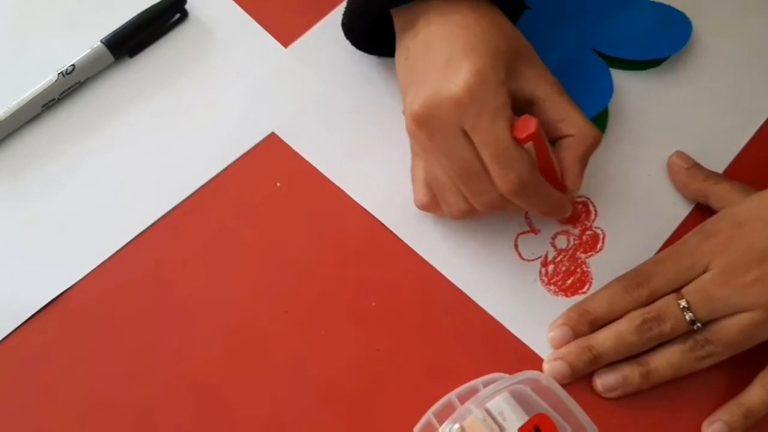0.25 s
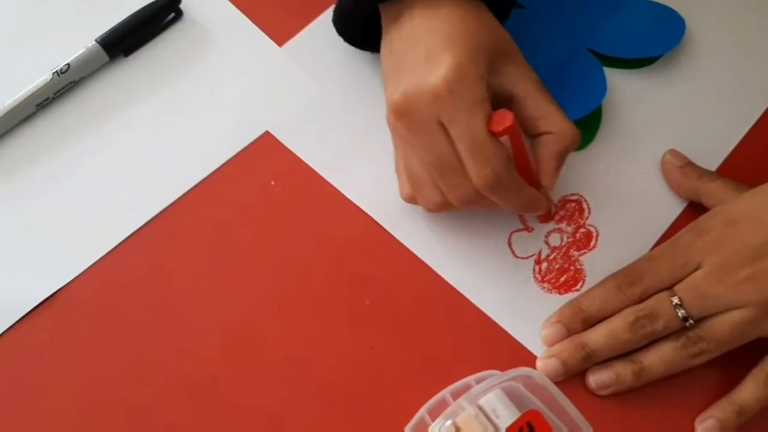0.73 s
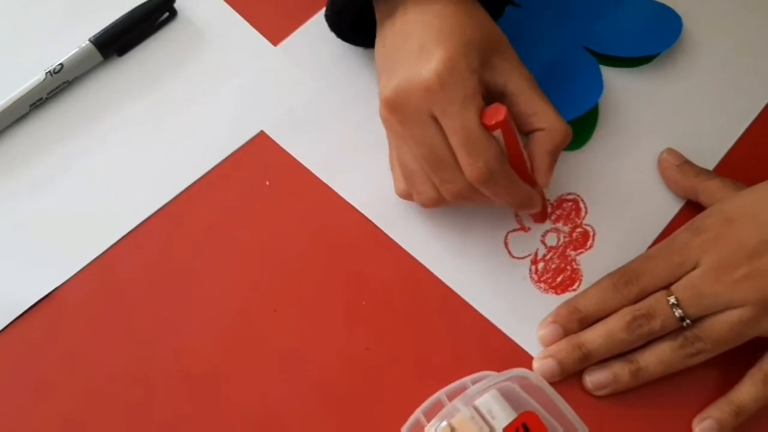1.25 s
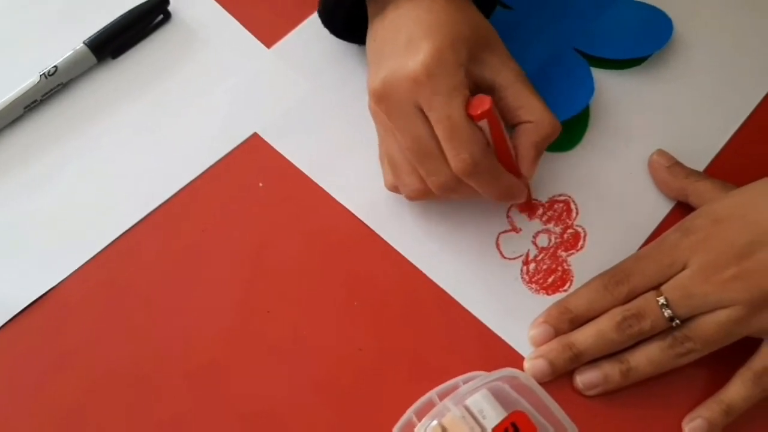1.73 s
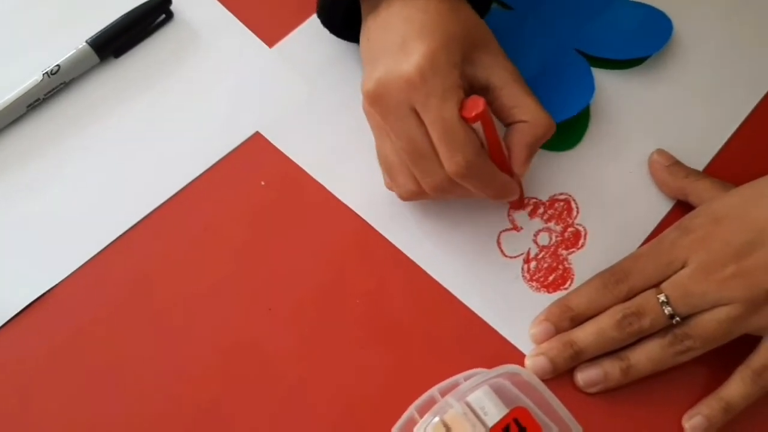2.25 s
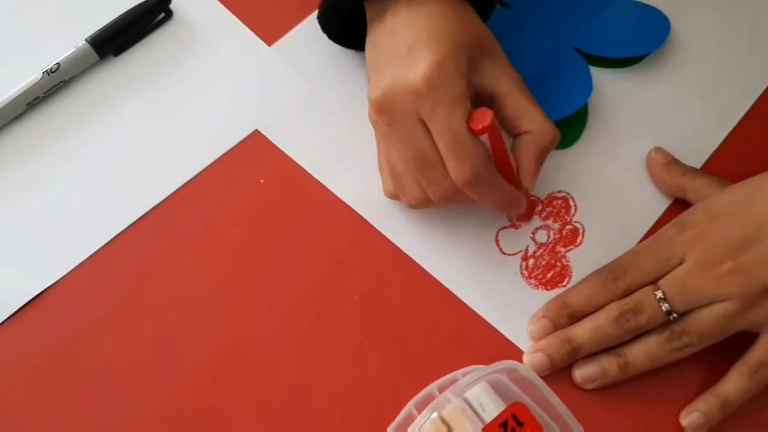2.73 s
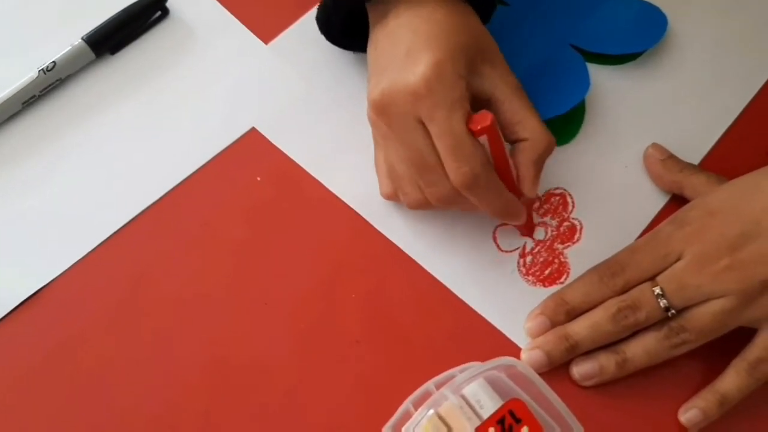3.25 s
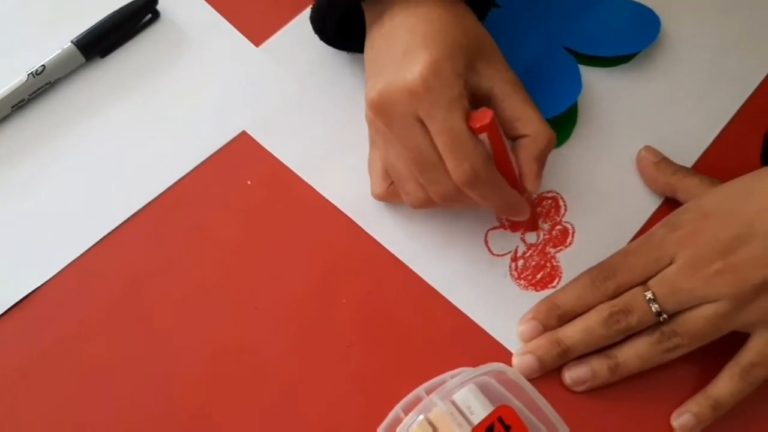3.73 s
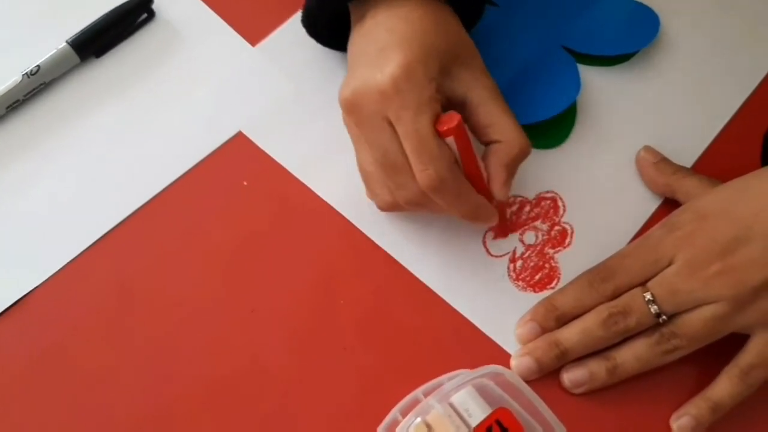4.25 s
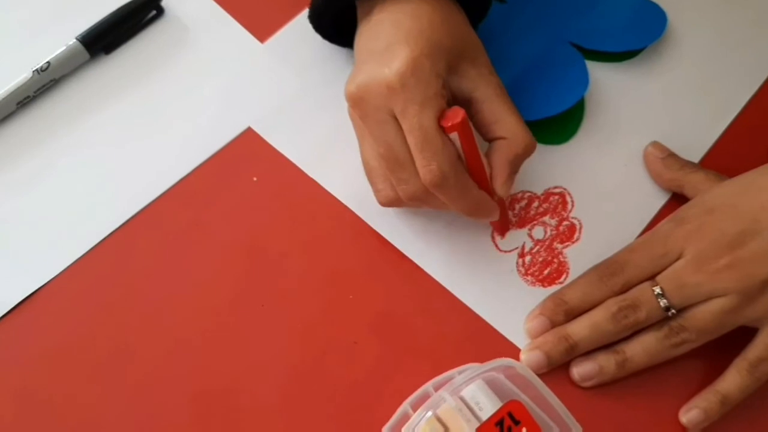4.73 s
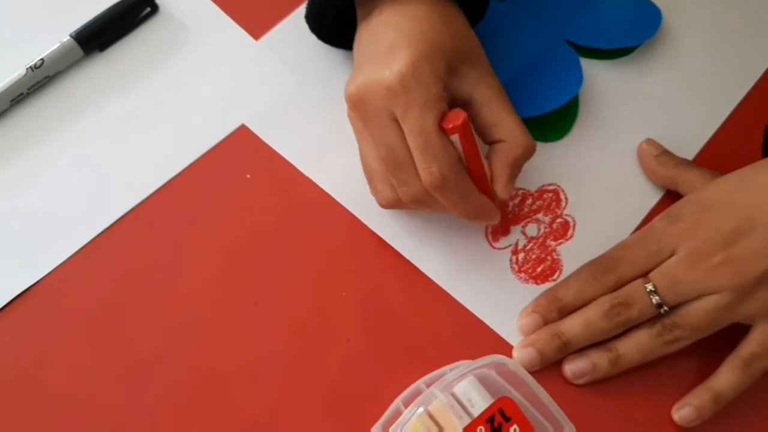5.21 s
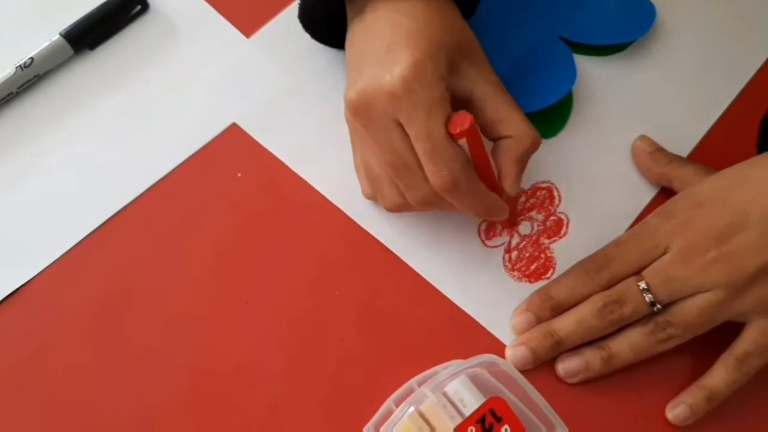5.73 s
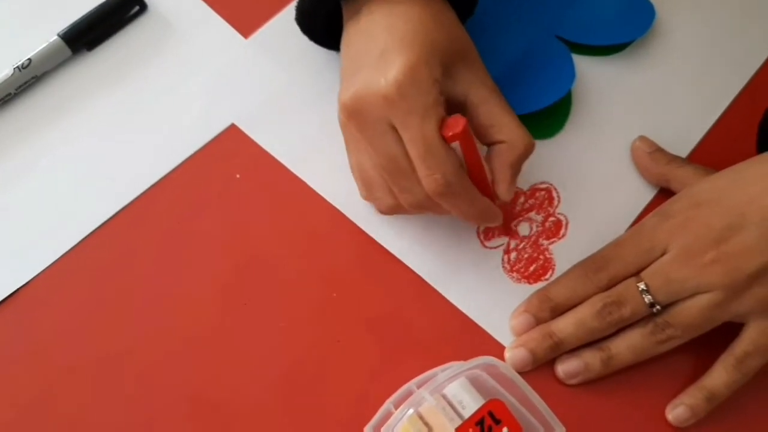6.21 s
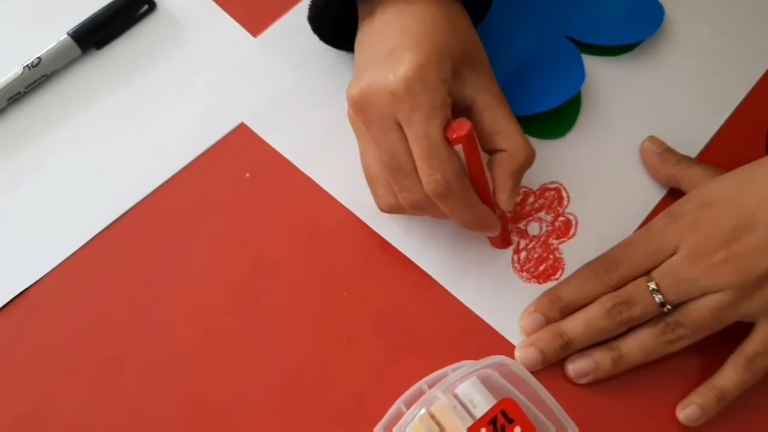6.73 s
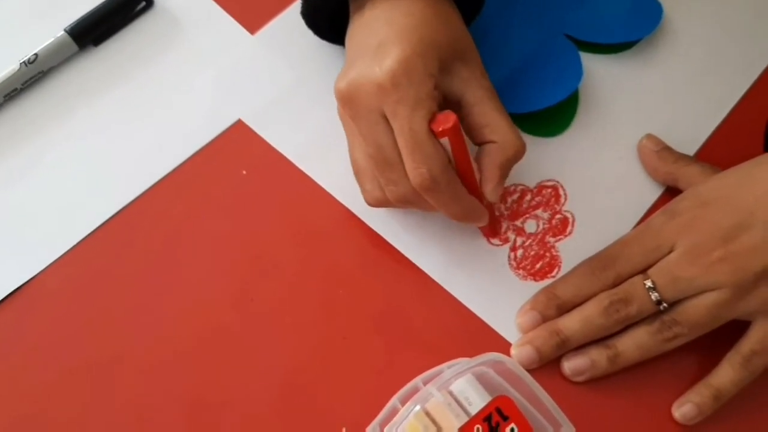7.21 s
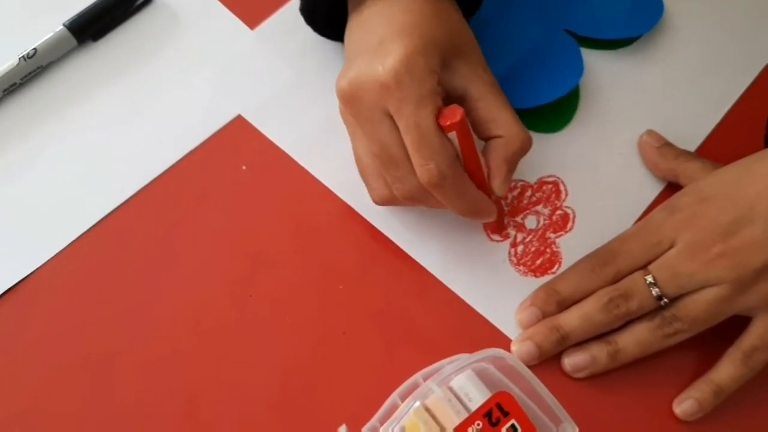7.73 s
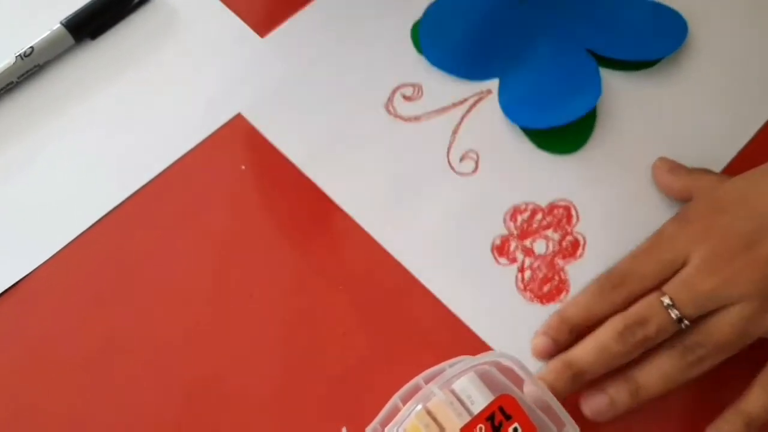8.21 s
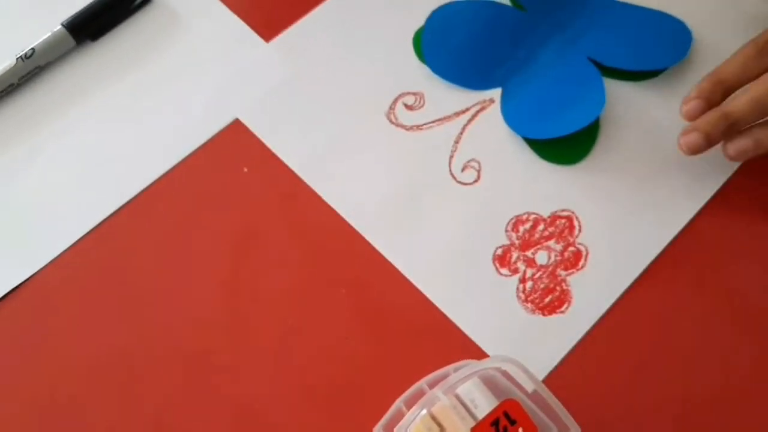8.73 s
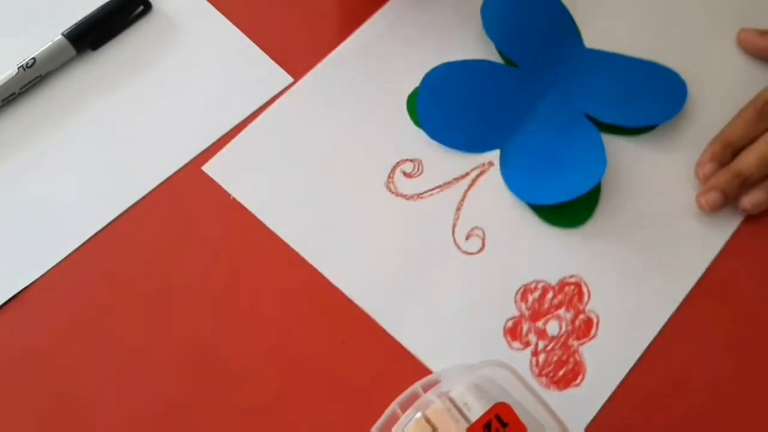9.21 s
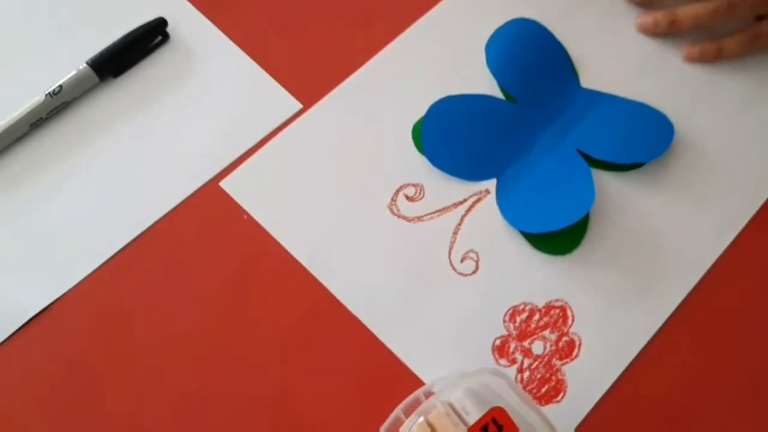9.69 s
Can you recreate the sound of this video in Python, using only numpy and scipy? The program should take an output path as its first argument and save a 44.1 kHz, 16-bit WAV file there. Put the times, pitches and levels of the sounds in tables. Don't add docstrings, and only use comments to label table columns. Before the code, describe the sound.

Close up in a quiet room, a wax crayon rubs back and forth on paper in short, even scratches, about nine a second. Paper crackles and squeaks briefly midway. The scribbling stops, a hand brushes the sheet twice, the paper drags, and a hard object clicks sharply on the table with a short room ring. Muffled traffic and a low engine drone grow slowly louder through the wall.

```python
import sys
import numpy as np
from scipy import signal
from scipy.fft import rfft, irfft, next_fast_len
from scipy.io import wavfile
from scipy.ndimage import uniform_filter1d

SR = 44100
rng = np.random.default_rng(int(sys.argv[2]) if len(sys.argv) > 2 else 0)


def persist_wave(psi):
    counts = np.round(np.clip(psi, -1, 1) * 32767).astype(np.int16)
    wavfile.write(sys.argv[1], SR, np.atleast_2d(counts).T)


def invert_db(x):
    u = np.asarray(x, float) / 20
    return 10 ** u


N = 439236

# pitch in Hz, left minus right in dB.
PORT_TILT_DB = [(30, -28), (60, 5.5), (120, 4.5), (250, 0), (800, 0)]
SWELL_SQUARENESS = 2.2


def in_time(rows):
    s, *columns = np.transpose(rows)
    return [np.interp(np.arange(N) / SR, s, column) for column in columns]


def drift(rate_hz):
    r = np.exp(-80 * np.pi * rate_hz / SR)
    chance = rng.standard_normal(N // 40 + 2002)
    slow = signal.lfilter([1], [1, -2 * r, r * r], chance)[2000:]
    return np.interp(np.arange(N) / 40, np.arange(len(slow)), slow / slow.std())


def swells(rows):
    t = np.arange(0, N + 40, 40) / SR
    gain = sum(invert_db(db) * np.exp(-np.abs((t - s) / half) ** SWELL_SQUARENESS) for s, half, db in rows)
    return np.interp(np.arange(N) / SR, t, gain)


def colour(x, rows):
    hz, *sides = np.transpose(rows)
    length = x.shape[-1]
    size = next_fast_len(length, real=True)
    axis = np.log(np.arange(size // 2 + 1) * SR / size + 1)
    gains = invert_db([np.interp(axis, np.log(hz), side, left=-60) for side in sides])
    out = irfft(rfft(x, size) * gains, size)[:, :length]
    return out / out.std()


def pair(source, alike):
    alike = np.clip(alike, 0, 1)
    unrelated = rng.standard_normal((2, len(source)), dtype=np.float32)
    return np.sqrt(alike) * source + np.sqrt(1 - alike) * unrelated


def grit(per_s, spread_db, size=N):
    chance, height, sign = rng.random((3, size), dtype=np.float32)
    strength = invert_db(spread_db * np.minimum(-np.log(height + 1e-9), 4))
    slips = strength * np.sign(sign - .5) * (chance < per_s / SR)
    return slips / slips.std()


def ring(clicks, hz, t60):
    r, w = invert_db(-60 / (t60 * SR)), 2 * np.pi * hz / SR
    return signal.lfilter([0, np.sin(w)], [1, -2 * r * np.cos(w), r * r], clicks + 1e-18)


def crayon():
    # mid-stroke in seconds, scratch in dB, half length in seconds.
    strokes = [(0.004, -73, 0.017), (0.1, -79.5, 0.038), (0.227, -74.5, 0.033), (0.351, -74, 0.061),
               (0.441, -70.5, 0.034), (0.563, -68.5, 0.035), (0.672, -79.5, 0.044), (0.781, -70, 0.036),
               (0.898, -69.5, 0.039), (1.007, -68.5, 0.033), (1.122, -71.0, 0.068), (1.24, -68.5, 0.039),
               (1.338, -65.5, 0.039), (1.45, -68.5, 0.032), (1.552, -68, 0.041), (1.671, -73.5, 0.037),
               (1.781, -70, 0.037), (1.892, -72.5, 0.034), (2.013, -68, 0.044), (2.121, -68, 0.037),
               (2.244, -63, 0.036), (2.348, -64, 0.03), (2.466, -64, 0.04), (2.571, -65, 0.029),
               (2.682, -62.5, 0.045), (2.801, -64.5, 0.034), (2.914, -65, 0.037), (3.027, -64.5, 0.034),
               (3.141, -67, 0.035), (3.26, -69.5, 0.042), (3.368, -74.5, 0.041), (3.478, -70.5, 0.056),
               (3.626, -69, 0.049), (3.805, -71, 0.035), (3.94, -69.5, 0.026), (4.046, -69.5, 0.041),
               (4.176, -71.5, 0.032), (4.284, -70.5, 0.041), (4.403, -71.5, 0.025), (4.528, -70.5, 0.041),
               (4.652, -71.5, 0.03), (4.773, -69, 0.039), (4.903, -67, 0.033), (5.018, -67, 0.033),
               (5.128, -66, 0.032), (5.251, -66.5, 0.038), (5.381, -66, 0.033), (5.495, -66.5, 0.044),
               (5.637, -70, 0.034), (5.743, -69, 0.034), (5.862, -70.5, 0.047), (5.97, -68, 0.032),
               (6.084, -74, 0.035), (6.324, -77, 0.039), (6.545, -72.5, 0.033), (6.634, -74.5, 0.033),
               (6.763, -74.5, 0.038), (6.862, -79, 0.038), (6.978, -75.5, 0.029), (7.096, -73, 0.039)]
    # pitch in Hz, left in dB, right in dB.
    scratch_colour = [(4200, -17, -32), (5000, -16, -30), (6200, -11, -17), (7400, -7.5, -8.5),
                      (9700, -6, -9), (10150, 2.5, -8), (10440, 4, -16), (11240, -3, -19),
                      (12000, -10.5, -21), (13300, -15, -12), (14900, -8, -17)]
    # pitch in Hz, left in dB, right in dB.
    body_colour = [(603, -16, -5), (1300, 14, 24.5), (1570, 8, 13.5), (2180, 3, 15), (2760, 6.5, 18.5),
                   (3260, -3, 12), (4500, -7, 2), (6500, -4.5, -7), (8450, -7, -11)]
    squareness = 2.3
    body_db, body_follows = -74.5, 0.75
    scratch, body = np.zeros((2, N))
    for s, db, half in strokes:
        near = slice(max(round((s - .15) * SR), 0), round((s + .15) * SR))
        t = np.arange(near.start, near.stop) / SR - s
        speed = np.exp(-np.abs(t / half) ** squareness) + 1e-9
        scratch[near] += invert_db(db + 0.3) * speed ** 1.2
        body[near] += invert_db(body_db + body_follows * (db - body_db)) * speed ** 0.64
    slips = grit(9000, spread_db=2.5) * invert_db(2.2 * drift(60))
    bright = invert_db(-1.0) * scratch * colour(pair(slips, alike=0.15), scratch_colour)
    return bright, invert_db(9.0) * body * colour(pair(slips, alike=0.19), body_colour)


def snaps():
    # time in seconds, peak in dB.
    ticks = [(.43, -52), (.742, -55), (.747, -54), (.752, -56), (5.2437, -55), (5.2687, -51), (5.346, -58),
             (5.7167, -52), (5.7376, -48), (5.822, -48), (5.832, -49), (6.52, -51), (7.78, -43),
             (7.856, -42), (8.66, -44), (8.708, -45)]
    clicks = np.zeros(N)
    for s, db in ticks:
        clicks[round(s * SR)] = invert_db(db)
    band = signal.butter(2, [3000, 11000], "band", fs=SR, output="sos")
    return signal.sosfilt(band, clicks) * invert_db([[2.0], [-2.0]])


def hand():
    # time in seconds, level in dB.
    slides = [
        [(7.52, -76), (7.7, -77), (7.8, -64.5), (7.87, -55.5), (7.93, -67), (8.0, -73), (8.15, -81), (8.3, -86)],
        [(8.46, -85), (8.58, -73), (8.68, -62.5), (8.8, -59.5), (8.956, -62), (9.134, -66.5), (9.28, -71),
         (9.6, -76), (9.9, -80)],
    ]
    # pitch in Hz, left in dB, right in dB.
    skin_colour = [(510, 10, -19), (1710, 14.5, 6), (3500, 3, 7), (5000, 4.5, 3), (8994, 3.5, 3),
                   (10200, 5, 3), (12500, 0, 0), (15500, -1, -2)]
    level = np.zeros(N)
    for rows in slides:
        before, after = (rows[0][0] - .1, -110), (rows[-1][0] + .06, -110)
        level += invert_db(in_time([before] + list(rows) + [after])[0])
    start = round(7.4 * SR)
    rub = colour(pair(grit(3000, spread_db=8.0, size=N - start), alike=0.14), skin_colour)
    return invert_db(2.0 + 1.0 * drift(25)) * level * np.pad(rub, ((0, 0), (start, 0)))


def crackles():
    # time in seconds, level in dB, rise in seconds, fall in seconds, buckling pitch in Hz,
    # strength of that pitch in dB.
    buckles = [
        (5.272, -55, 0.012, 0.013, 7000, -7),
        (5.334, -68, .003, .003, 4900, 8),
        (5.3392, -63, 0.001, 0.004, 4850, 12),
        (5.348, -62, 0.003, 0.006, 4900, 8),
        (5.355, -57, 0.009, .022, 7600, 1),
        (5.737, -58, 0.016, 0.018, 7240, -3),
        (5.746, -62, .008, 0.032, 5000, 3),
        (5.84, -72, .03, .04, 6000, -3),
    ]
    # pitch in Hz, left in dB, right in dB.
    paper_colour = [(2500, -20, -14), (4230, -12, 0), (5600, -8.5, 0), (6507, 0, -11), (8000, -5, -6),
                    (9500, -20, -10), (15000, -22, -18)]
    start, stop = round(5.1 * SR), round(5.95 * SR)
    slips = grit(9000, spread_db=2.5, size=stop - start)
    rustle = colour(pair(slips, alike=0.4), paper_colour) * [[1], [-1]]
    out = np.zeros((2, N))
    for s, db, rise, fall, hz, share_db in buckles:
        band = signal.butter(4, [hz / 1.17, hz * 1.25], "band", fs=SR, output="sos")
        buckle = signal.sosfilt(band, rustle)
        t = np.arange(start, stop) / SR - s
        swell = invert_db(db) * np.exp(-np.abs(t / np.where(t < 0, rise, fall)) ** 1.3)
        out[:, start:stop] += swell * (0.97 * rustle + invert_db(share_db - 4.0) * buckle)
    return out


def squeaks():
    # time in seconds, level in dB.
    moments = [
        (5.3375, -55),
        (5.3385, -51),
        (5.3405, -51),
        (5.343, -54),
        (5.3465, -52),
        (5.348, -51),
        (5.353, -55),
        (5.7376, -54),
        (5.744, -56),
    ]
    # pitch in Hz, level in dB, ringing time t60 in seconds.
    modes = [(4300, 0, .012), (5000, -2, .01), (5550, 0, .015)]
    start, length = round(5.3 * SR), SR // 2
    at = [round(s * SR) - start for s, db in moments]
    out = np.zeros(N)
    for hz, level_db, t60 in modes:
        slips = np.zeros(length)
        slips[at] = invert_db(np.transpose(moments)[1] + level_db - 5 + rng.normal(0, 2, len(at)))
        out[start:start + length] += ring(slips, hz, t60)
    return out


def sheet():
    # middle in seconds, half length in seconds, level in dB.
    drags = [
        (7.7, .2, -62.5),
        (8.88, .14, -72),
        (9.62, 0.21, -61.5),
    ]
    # pitch in Hz, width in Hz.
    hollows = [(1620, 79), (1790, 70), (2200, 150)]
    rub = pair(grit(5000, spread_db=0.5), alike=0.28)
    tone = sum(signal.lfilter(*signal.iirpeak(hz, hz / width, fs=SR), rub) for hz, width in hollows)
    return swells(drags) * invert_db(3.0 * drift(14)) * tone / tone.std() * invert_db([[-2.5], [2.5]])


def click():
    # time in seconds, level in dB, contact treble limit in Hz.
    contacts = [
        (8.9897, -18, 2500),
        (8.992, -4.5, 30000),
        (8.9933, -17, 6000),
        (8.9962, -15, 5000),
        (9.0055, -18, 3000),
        (9.0135, -13, 4000),
        (9.0155, -15, 3000),
        (9.019, -15, 2500),
        (9.034, -21, 2000),
    ]
    # pitch in Hz, left in dB, right in dB, ringing time t60 in seconds.
    modes = [(488, -38, -28, 0.17), (594, -36, -32, 0.21), (624, -42, -41, .2), (842, -27, -23, 0.24),
             (840, -9.5, -33, 0.021), (883, -36, -36, 0.16), (1255, -27, -26, 0.33), (1440, -28, -23, 0.15),
             (1500, -33, -21, 0.038), (1464, -32, -23, 0.18), (1593, -31, -25, 0.29),
             (1882, -30, -22, 0.16), (2140, -42, -31, 0.3), (2250, -30, -2.5, 0.008),
             (2567, -24, -12, 0.04), (2900, -14, 0, 0.0027), (3252, -44, -34, 0.26),
             (7440, -22, -17.5, 0.0057), (11250, -39, -13.5, 0.0088), (15000, -36, -21, .006)]
    # time in seconds, level in dB, pitch in Hz, ringing time t60 in seconds.
    thump = (8.989, -31.5, 238, 0.2)
    # pitch in Hz, band ratio, left in dB, right in dB, dying time t60 in seconds.
    tail = [(363, 1.12, -49, -45, 0.25), (493, 1.38, -31.5, -28, 0.25), (806, 1.12, -35, -30.5, 0.26),
            (1480, 1.5, -30, -26.5, 0.34), (2200, 1.26, -44, -35, 0.55), (3830, 1.07, -48, -43, 0.39),
            (5400, 1.2, -63, -59, 0.28), (7460, 1.08, -59, -65, 0.27), (11300, 1.04, -63.5, -58, 0.18),
            (9000, 1.8, -49.5, -43.5, 0.29)]
    start = round(8.97 * SR)
    t = np.arange(N - start) / SR + start / SR
    hits, push = np.zeros((2, len(t)))
    for s, db, cut_hz in contacts:
        contact = np.exp(-2 * np.pi * cut_hz / SR * np.arange(40))
        at = round(s * SR) - start
        hits[at:at + len(contact)] += invert_db(db) * contact / contact.sum()
    thump_s, thump_db, thump_hz, thump_t60 = thump
    push[round(thump_s * SR) - start] = -invert_db(thump_db)
    out = ring(push, thump_hz, thump_t60) * np.ones((2, 1))
    for k, (hz, left_db, right_db, t60) in enumerate(modes):
        sides = invert_db([[left_db], [right_db - .7]]) * [[np.sign(700 - hz)], [1]]
        out += -(-1) ** k * ring(hits, hz, t60) * sides
    out[0] = np.roll(out[0], 6)
    flutter_db = 1.5 * drift(200)[start:]
    since = np.maximum(t - contacts[1][0], 0)
    for hz, ratio, left_db, right_db, t60 in tail:
        band = signal.butter(2, [hz / ratio, min(hz * ratio, 18000)], "band", fs=SR, output="sos")
        white = pair(rng.standard_normal(len(t)), alike=1 - hz / 1900)
        noise = signal.sosfilt(band, white)
        dying = invert_db(-60 * since / t60 + flutter_db) * (1 - np.exp(-since / 0.003))
        out += noise / noise.std() * dying * invert_db([[left_db + 3.5], [right_db + 0.5]])
    return np.pad(out, ((0, 0), (start, 0)))


def engine():
    # time in seconds, firing rate in Hz, load as level of order 1 in dB.
    running = [(0, 58.3, -64), (.4, 58.06, -59), (1.4, 58.44, -68), (2.1, 56.66, -53.5), (2.75, 56, -55.5),
               (3.1, 55.99, -49), (3.35, 56.4, -63), (3.9, 56.4, -72), (4.25, 55.8, -57),
               (4.58, 56.53, -60), (5, 56.26, -55), (5.4, 57.1, -58), (6.2, 57.2, -51),
               (7.05, 56.67, -46.5), (7.46, 55.3, -52.5), (8.75, 54.87, -43), (9.33, 54.43, -51),
               (9.96, 54.74, -48)]
    orders_db = [0, -15.5, -16.5, -8.5]
    orders_waver_db = [1.7, 1.6, 2.1, 0.99]
    orders_wobble = [.28, .28, .3, .4]
    # order, level in dB against the load.
    upper = [(6, -28), (10, -37.5), (11, -34.5)]
    # middle in seconds, half length in seconds, level in dB.
    wall_booms = [(.12, 0.27, -58), (.8, 0.64, -58.5), (1.87, 0.25, -51.5), (2.41, 0.2, -50),
                  (2.95, 0.23, -65), (4.87, 0.2, -51), (5.35, 0.23, -51.5), (7.08, 0.17, -52.5),
                  (7.58, 0.16, -41), (8.15, 0.4, -36), (8.5, 0.051, -54), (8.72, 0.067, -42),
                  (9.12, 0.14, -36), (9.49, 0.12, -37.5), (9.73, 0.11, -38), (9.88, 0.11, -44)]
    # middle in seconds, half length in seconds, level in dB.
    floor_hums = [(1.8, 0.15, -63), (4.22, 0.057, -77), (5.6, 0.28, -51), (6.0, 0.24, -58.5),
                  (6.4, 0.17, -52.5), (6.75, 0.21, -48), (7.15, 0.043, -56), (7.9, 0.23, -51),
                  (8.3, 0.07, -48), (8.6, 0.25, -54), (9.2, 0.099, -48), (9.55, 0.16, -49.5),
                  (9.95, 0.053, -51)]
    # middle in seconds, half length in seconds, level in dB.
    pane_drones = [(.02, 0.14, -52), (.5, 0.11, -61), (1.1, 0.56, -54), (1.83, 0.14, -54),
                   (2.24, 0.057, -61), (2.7, 0.31, -59), (3.13, 0.041, -49.5), (3.58, 0.12, -55.5),
                   (4.22, 0.12, -49), (4.62, 0.21, -47), (4.42, .08, -73), (4.97, 0.2, -52.5),
                   (5.55, 0.24, -44), (5.93, 0.23, -51), (6.3, 0.11, -41.5), (6.68, 0.18, -41),
                   (6.95, 0.15, -41.5), (7.45, 0.055, -43.5), (7.77, 0.21, -40.5), (8.1, 0.061, -44),
                   (8.36, 0.15, -37.5), (8.55, 0.07, -57), (8.93, 0.058, -41.5), (9.2, 0.052, -40),
                   (9.49, 0.051, -45), (9.91, 0.14, -40.5)]
    hz, load_db = in_time(running)
    phase = 2 * np.pi * np.cumsum(hz * (1 + 0.0031 * drift(4.93))) / SR
    levels = [invert_db(load_db + db + waver_db * drift(4.8)) for db, waver_db in zip(orders_db, orders_waver_db)]
    levels[1] += swells(wall_booms)
    levels[2] += swells(floor_hums)
    levels[3] += swells(pane_drones)
    load = uniform_filter1d(levels[1] + levels[3], size=SR // 3)
    out = load * sum(invert_db(db + 5.7 * drift(8.6)) * np.sin(order * phase + order ** 2) for order, db in upper)
    for k, level in enumerate(levels):
        tilt_db = np.interp(56 * (k + 1), *np.transpose(PORT_TILT_DB)) / 2
        wave = np.sin((k + 1) * phase + orders_wobble[k] * drift(12.0))
        tone = np.sqrt(2) * level * invert_db(-2.0 + 0.51 * drift(25.0)) * wave
        out = out + tone * invert_db([[tilt_db], [-tilt_db]])
    return out


def idler():
    # time in seconds, pitch in Hz, level in dB.
    running = [(0, 52.3, -55), (.6, 43.77, -66), (1.3, 44.77, -56.5), (2.1, 45.27, -69), (2.6, 46.7, -56),
               (3.1, 49.74, -54.5), (3.4, 49.55, -73), (3.8, 50.1, -56), (4.3, 47.84, -67), (5, 48.27, -62)]
    hz, db = in_time(running)
    phase = 2 * np.pi * np.cumsum(hz * (1 + 0.0097 * drift(2.26))) / SR
    return invert_db(db + 2.0 * drift(35)) * np.sqrt(2) * (np.sin(phase) + invert_db(-3.0) * np.sin(3 * phase))


def far_motor():
    # middle in seconds, half length in seconds, level in dB.
    hums = [
        (1.6, 0.16, -57),
        (1.9, 0.068, -52),
        (4.3, 0.17, -54.5),
        (4.9, 0.21, -60),
        (8.1, 0.8, -56),
        (9.4, .15, -62),
    ]
    phase = 2 * np.pi * 146 * np.cumsum(1 + 0.0168 * drift(6.0)) / SR
    return swells(hums) * np.sqrt(2) * np.sin(phase)


def singing():
    # middle in seconds, half length in seconds, pitch in Hz, width in Hz, level in dB.
    songs = [(1.05, .22, 1350, 80, -64.5), (1.38, .17, 1850, 60, -68), (1.15, .12, 2500, 120, -73),
             (2.2, .24, 2350, 50, -70), (2.68, .08, 1870, 70, -68), (.43, .03, 2780, 120, -68),
             (.6, .08, 1330, 90, -73), (.53, .06, 490, 40, -66), (1.7, .4, 800, 120, -72),
             (8.68, .08, 450, 40, -60), (2.45, .3, 1320, 80, -71), (2.9, .4, 2650, 100, -75),
             (7.85, .2, 610, 30, -62), (8.88, .1, 1900, 100, -64), (3.3, .3, 1340, 80, -72),
             (4.95, .2, 1300, 80, -72), (5.5, .12, 2650, 120, -73), (5.75, .3, 1250, 250, -68),
             (6.7, .12, 1570, 80, -72), (7.05, .1, 2050, 80, -71), (7.77, .05, 2050, 120, -65),
             (7.95, .12, 1450, 200, -65), (7.85, .12, 520, 90, -58), (8.75, .15, 540, 120, -59),
             (9.6, .2, 1630, 50, -66), (1.3, .5, 350, 14, -64), (1.1, .3, 410, 14, -67),
             (2.2, .45, 268, 14, -58), (2.2, .3, 350, 14, -64), (3.1, .4, 352, 14, -62),
             (3.0, .25, 315, 14, -63), (.7, .3, 270, 25, -60), (3.7, .25, 265, 25, -60),
             (5.2, .5, 265, 20, -60), (6.6, .5, 265, 25, -57), (7.4, .12, 340, 14, -56),
             (8.1, .3, 325, 20, -58), (9.05, .05, 248, 20, -47)]
    out, white = np.zeros((2, N)), rng.standard_normal((3, N), dtype=np.float32)
    for s, half, hz, width, db in songs:
        start, stop = max(round((s - 2 * half) * SR), 0), min(round((s + 2 * half) * SR), N)
        peak = signal.iirpeak(hz, hz / width, fs=SR)
        alike = max(1 - hz / 2500, 0)
        source = np.sqrt(alike) * white[0, start:stop] + np.sqrt(1 - alike) * white[1:, start:stop]
        tone = signal.lfilter(*peak, signal.lfilter(*peak, source))
        t = np.arange(start, stop) / SR - s
        swell = invert_db(db) * np.exp(-np.abs(t / half) ** SWELL_SQUARENESS)
        out[:, start:stop] += swell * tone / tone.std()
    return out


def street():
    # time in seconds, level of tyre roar in dB.
    traffic = [(0, -62), (.36, -69.5), (1.08, -59.5), (1.44, -60.5), (1.62, -66.5), (1.9, -68.5),
               (2.19, -61.5), (2.9, -63.5), (4.24, -65.5), (5.3, -62.5), (5.63, -57.5), (6.5, -60.5),
               (7.3, -58), (7.9, -52.5), (8.52, -57), (8.99, -52.5), (9.28, -53.5), (9.6, -52)]
    # pitch in Hz, level in dB.
    rumble_colour = [(15, -37), (25, -14.5), (54, -4), (130, -4), (178, -5), (237, 1), (330, -8),
                     (419, -15.5), (494, -15.5), (677, -31), (900, -28), (1170, -63), (1980, -120)]
    # pitch in Hz, left in dB, right in dB.
    roar_colour = [(345, 6.5, 7), (554, 2, 1), (908, -1, 2), (1350, -1, 1), (1800, -3.5, 3.5),
                   (2430, -12, -6), (3110, -21.5, -12.5), (4480, -32, -25.5), (5870, -44, -44)]
    # pitch in Hz, left in dB, right in dB.
    air_colour = [(2480, -1, 8), (3970, -0.5, 6), (5860, -4.5, -5), (8800, 1, -2.5), (9250, -5, -11),
                  (10400, -12, -12), (12000, -7, -10), (15500, -11, -6.5)]
    # middle in seconds, half length in seconds, level in dB.
    rustles = [(0, 0.1, -84.5), (.85, 0.36, -77), (1.42, 0.16, -79), (2.38, 0.22, -76.5), (2.85, 0.25, -78),
               (4.85, .15, -86), (5.33, 0.11, -78), (5.85, .1, -81), (7.3, 0.38, -79), (7.85, 0.1, -72),
               (8.1, 0.27, -78), (9.2, .03, -73), (9.33, 0.06, -76), (9.48, 0.063, -72), (9.7, 0.16, -97),
               (8.62, 0.1, -74), (8.84, 0.14, -68.5)]
    roar_db, = in_time(traffic)
    swing_db = roar_db - roar_db.mean()
    rumble_db = -60 + 0.51 * np.arange(N) / SR + 0.2 * swing_db
    airy = invert_db(-79 + 0.68 * swing_db) + swells(rustles)
    low = []
    for hz, db in rumble_colour:
        tilt_db = np.interp(hz, *np.transpose(PORT_TILT_DB)) / 2
        low.append((hz, db + tilt_db, db - tilt_db))
    shaking = colour(pair(rng.standard_normal(N), alike=0.9), low)
    rumble = invert_db(rumble_db + 7.5 + 0.52 * drift(7.7)) * shaking
    roar = invert_db(roar_db + 3.5) * colour(pair(rng.standard_normal(N), alike=0.42), roar_colour)
    air = airy * invert_db(2.5 + 1.0 * drift(5.4)) * colour(rng.standard_normal((2, N)), air_colour)
    return rumble, roar, air


def hiss():
    # pitch in Hz, left in dB, right in dB.
    hiss_colour = [(3100, -7, 9), (6000, -1, -16), (10000, 5, 3), (15500, -4, -2)]
    return invert_db(-82.5) * colour(rng.standard_normal((2, N)), hiss_colour)


def lull():
    # time in seconds, half width in seconds, depth in dB.
    moment = (7.204, 0.024, -14)
    s, width, db = moment
    return invert_db(db * np.clip(1 - np.abs(np.arange(N) / SR - s) / width, 0, 1))


def room(x):
    # pitch in Hz, width in Hz, level in dB.
    resonances = [(1340, 110, 0.5), (1890, 63, 0), (2310, 120, 0), (2620, 140, 2.5)]
    t60_s, echo_db = .3, -5.5
    t = np.arange(round(.3 * SR)) / SR
    echo = rng.standard_normal((2, len(t))) * invert_db(-60 * t / t60_s)
    echo = invert_db(echo_db) * echo / np.sqrt(np.sum(echo ** 2, axis=1, keepdims=True))
    wet = x + signal.oaconvolve(x, echo, axes=1)[:, :N]
    for hz, width, db in resonances:
        peak = signal.iirpeak(hz, hz / width, fs=SR)
        wet = wet + (invert_db(db) - 1) * signal.lfilter(*peak, wet)
    return wet * x.std() / wet.std()


def lagged(x):
    return np.array([x[0], np.roll(x[1], 14)])


def patchy(x, depth_db):
    spectra = signal.stft(x, nperseg=512)[2]
    chance = rng.standard_normal(spectra.shape[1:])
    chance = uniform_filter1d(chance, size=4, axis=0)
    chance = uniform_filter1d(chance, size=11, axis=1)
    gains = invert_db(depth_db * chance / chance.std())
    return signal.istft(spectra * gains, nperseg=512)[1][:, :N]


def scene():
    scratch, body = crayon()
    rumble, roar, air = street()
    rubbing = patchy(scratch + snaps() + hand() + air + lagged(room(body + roar)), depth_db=2.0)
    handling = crackles() + squeaks() + sheet() + click()
    low = lull() * (engine() + idler() + far_motor() + rumble)
    return rubbing + handling + low + singing() + hiss()


def roll_off(x):
    return signal.sosfilt(signal.butter(12, 16500, fs=SR, output="sos"), x)


def record(dry):
    x = signal.sosfilt(signal.butter(5, 38, "high", fs=SR, output="sos"), dry)
    x = signal.sosfilt(signal.ellip(10, .5, 70, 15700, fs=SR, output="sos"), x)
    x = x * np.clip((N - 1 - np.arange(N)) / (.004 * SR), 0, 1)
    return roll_off(x)


dry = scene()
out = record(dry)
persist_wave(out)
```